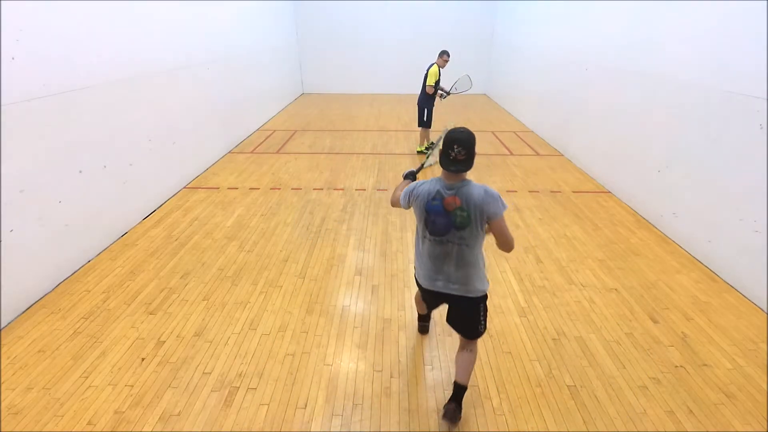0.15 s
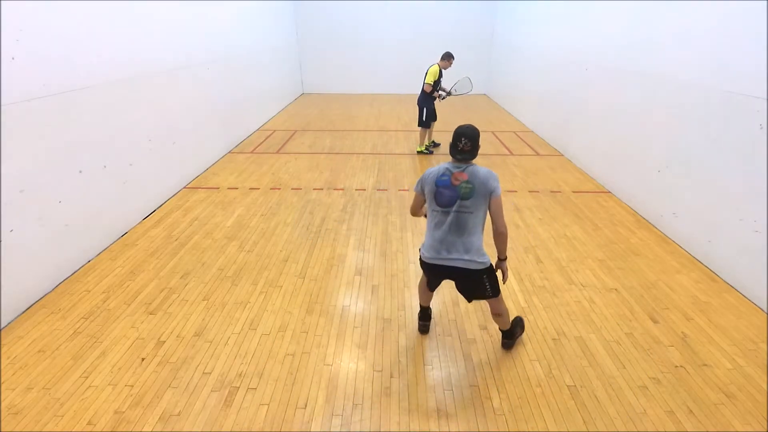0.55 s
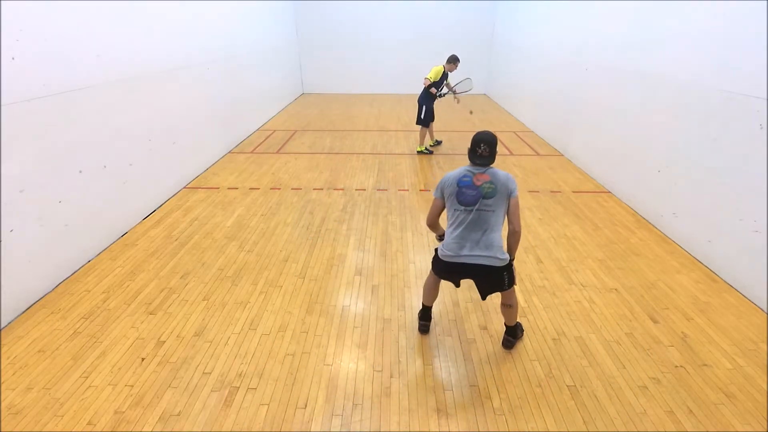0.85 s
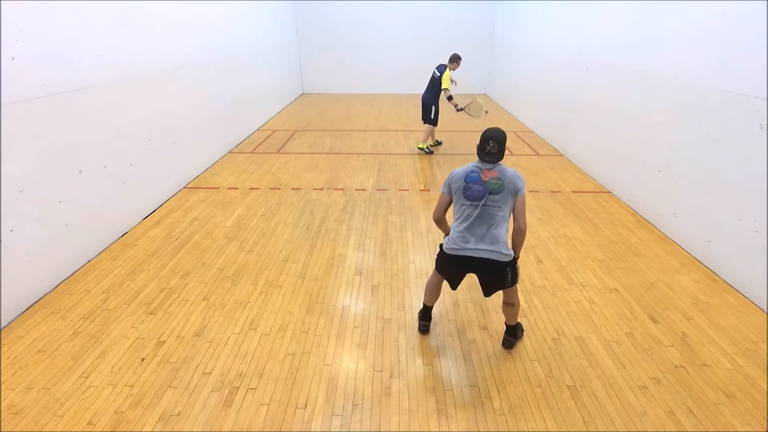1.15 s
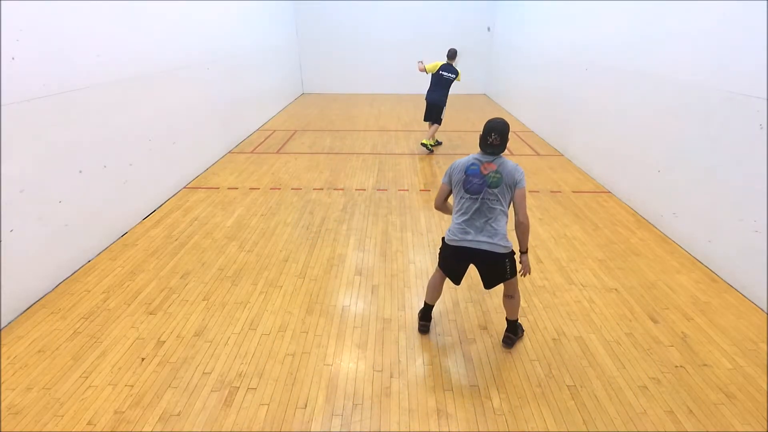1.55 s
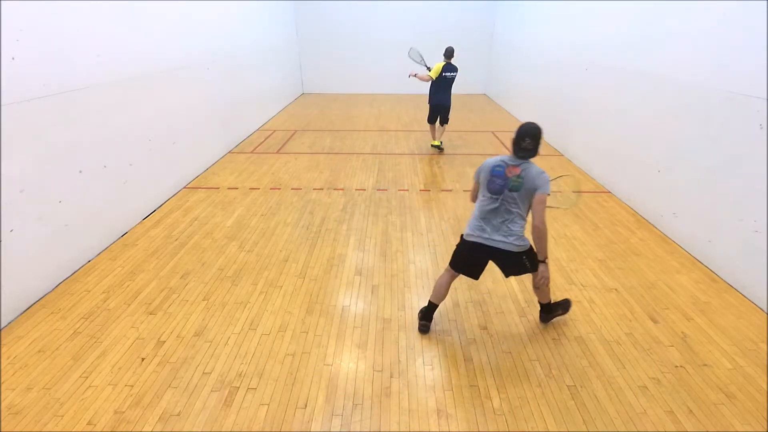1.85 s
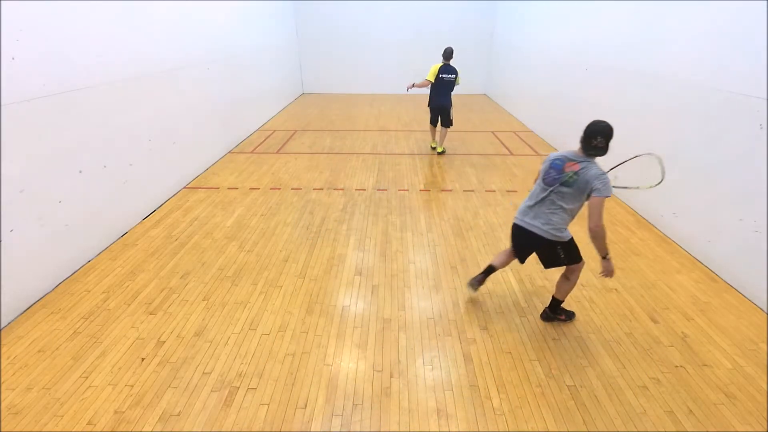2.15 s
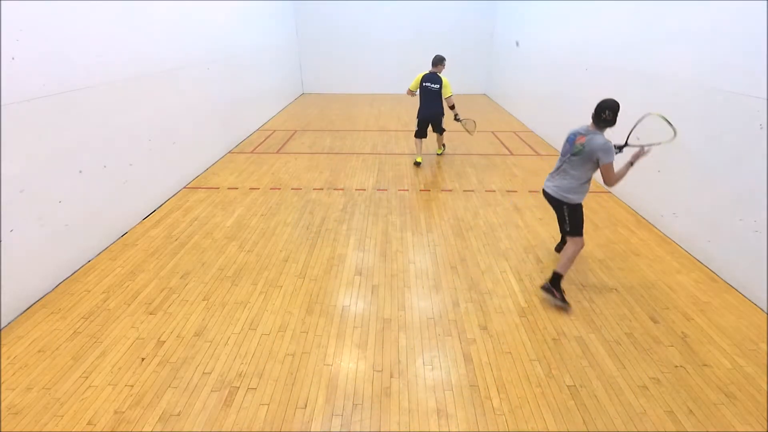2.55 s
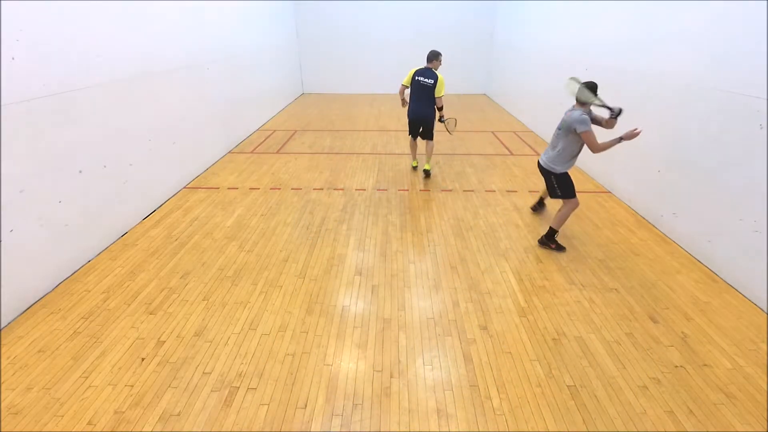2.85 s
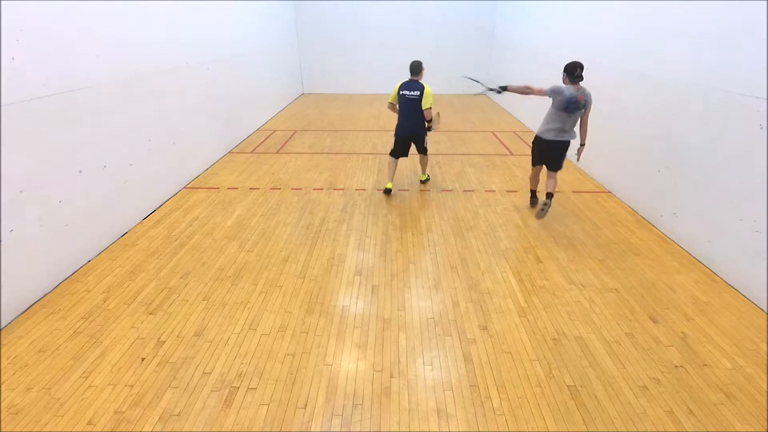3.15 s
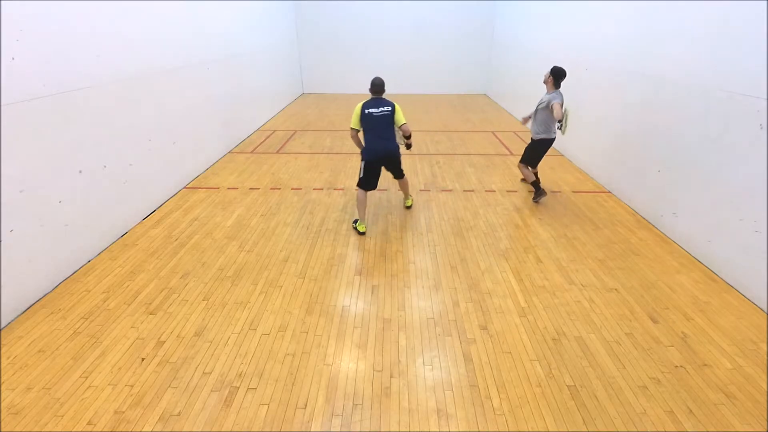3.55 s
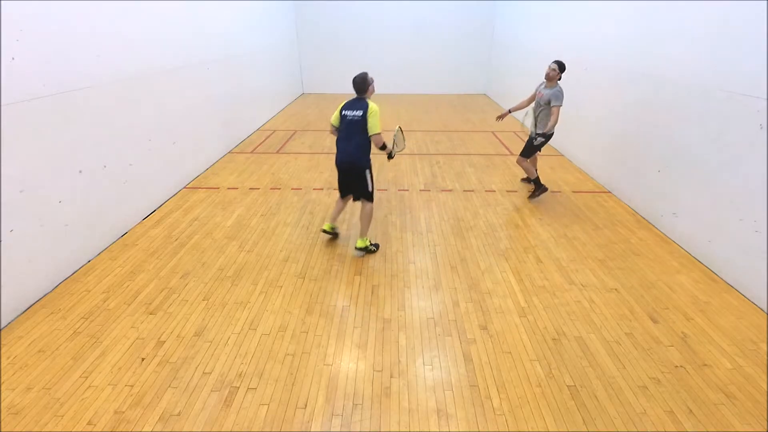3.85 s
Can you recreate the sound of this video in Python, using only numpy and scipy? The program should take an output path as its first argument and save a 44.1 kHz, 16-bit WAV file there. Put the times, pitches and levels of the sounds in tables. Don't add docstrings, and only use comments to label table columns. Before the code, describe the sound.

Hard racquetball blows boom and echo through a bare indoor court after a sharp shoe squeak

```python
import sys
import numpy as np
from scipy import signal
from scipy.fft import rfft, irfft
from scipy.io import wavfile
from scipy.ndimage import uniform_filter1d

SR = 44100
rng = np.random.default_rng(int(sys.argv[2]) if len(sys.argv) > 2 else 0)


def inscribe(sig):
    pcm = np.round(np.clip(np.atleast_2d(sig).T, -1, 1) * 32767)
    wavfile.write(sys.argv[1], SR, pcm.astype(np.int16))


def boost(x):
    u = np.asarray(x, float) / 20
    return 10 ** u


N = 176400

# (time [s], level [dB], contact brightness [Hz], boom [dB re
# blow], hollow ring [dB re blow])
BLOWS = [
    (-.3, -40.5, 1500, -9.5, -27),
    (.965, -50, 2500, -10.5, -22),
    (1.127, -38, 2500, -12.5, 2),
    (1.531, -46, 6000, -18, 6),
    (2.093, -29, 2500, -10.5, 11),
    (2.849, -53, 1500, 6, -8),
    (2.956, -33.5, 2500, -7, -38),
    (3.202, -8, 2000, -52, -1),
    (3.423, -5.5, 4000, -38, -4),
]


def set_rms(x, db):
    return x * boost(db) / np.sqrt(np.mean(x ** 2))


def along(table, hz, axis=1):
    table = np.array(table)
    return np.interp(np.log(hz + 1), np.log(table[:, 0]), table[:, axis])


def walk(rate_hz, size):
    k = max(int(SR / rate_hz), 1)
    noise = rng.standard_normal(size + 4 * k)
    smooth = uniform_filter1d(uniform_filter1d(noise, k), k)
    return smooth[2 * k:2 * k + size] * np.sqrt(1.5 * k)


def band_noise(low_hz, high_hz):
    band = signal.butter(2, [low_hz, high_hz], "band", fs=SR, output="sos")
    return signal.sosfilt(band, rng.standard_normal((2, N)))


def add(out, x, s):
    i = int(s * SR)
    x = x[:, max(-i, 0):N - i]
    out[:, max(i, 0):max(i, 0) + x.shape[1]] += x


def room_air():
    tilt_hz, level_db, swell_db = 1500, -37, 1
    pole = np.exp(-2 * np.pi * tilt_hz / SR)
    air = signal.lfilter([1], [1, -pole], rng.standard_normal((2, N)))
    return set_rms(air, level_db) * boost(swell_db * walk(4, size=N))


def floor_rumble():
    # (centre [Hz], width [Hz], level [dB])
    rumble = [(84, 22, -77.5), (158.5, 48, -73)]
    # (centre [Hz], width [Hz], level [dB])
    drones = [(151.8, 12, -72), (625, 42, -64)]
    # (time [s], swell over rumble [dB])
    steps = [
        (.35, 3.5),
        (.74, 0),
        (1.15, 13.5),
        (2.1, 22),
        (2.33, 22.5),
        (2.65, 16),
        (2.96, 26),
        (3.12, 15),
    ]
    rise_s, fall_s = 0.03, 0.12
    t = np.arange(N) / SR
    swell = 1
    for s, db in steps:
        late = np.maximum(t - s, 0)
        swell = swell + boost(db) * (1 - np.exp(-late / rise_s)) * np.exp(-late / fall_s)

    def hum(rows):
        return sum(set_rms(band_noise(f - w / 2, f + w / 2), db) for f, w, db in rows)

    return swell * hum(rumble) + hum(drones)


def blow(db, bright_hz, boom_db, ring_db):
    boom_hz, ring_hz, ring_t60_s = 185, 922.6, 0.035
    t = np.arange(2048) / SR

    def push(hz):
        return np.exp(-2 * np.pi * hz * t) * 2 * np.pi * hz / SR

    recoil = push(boom_hz / 2)
    contact = push(bright_hz) - recoil
    boom = boost(boom_db + 26) * (push(boom_hz) - recoil)
    ring = np.sin(2 * np.pi * ring_hz * t) * boost(-60 * t / ring_t60_s)
    ring = ring * 2 * np.log(1000) / ring_t60_s / SR
    return boost(db) * 100 * (contact + boom + boost(ring_db) * ring)


def court(first):
    # (frequency [Hz], t60 [s], build-up [s])
    decay = [(60, 0.3, 0.01), (201, 2.9, 0.02), (850, 2.08, 0.021), (2000, 3.06, 0.0045),
             (4000, 3.68, 0.0032), (7700, 1.57, 0.0034), (11100, 1.51, 0.002)]
    # (delay [s], level [dB], thinness [0-1])
    echoes = [(0, 5, 0.7), (.008, -14, 0.6), (.016, 2, .8), (0.028, -2, 0)]
    early_db, early_s, direct_s, hop = -9, 0.15, 0.001, 64
    hz = np.fft.rfftfreq(4 * hop, 1 / SR)[:, None]
    t = np.arange(N // hop + 4) * hop / SR
    rise = 1 - np.exp(-(t / along(decay, hz, axis=2)) ** 2)
    early = 1 + boost(early_db) * np.exp(-t / early_s)
    shape = rise * early * boost(-60 * t / along(decay, hz))
    chance = rng.standard_normal((2, 2) + shape.shape)
    spectrum = shape * (chance[0] + 1j * chance[1])
    tail = signal.istft(spectrum, nperseg=4 * hop, noverlap=3 * hop)[1][:, :N]
    tail = tail / np.sqrt(np.sum(tail ** 2) / 2 * 0.01)
    if first:
        for s, db, thin in echoes:
            burst = rng.standard_normal((2, 1024)) * np.exp(-np.arange(1024) / SR / direct_s)
            burst = signal.lfilter([1, -thin], [1], burst)
            add(tail, boost(db) * burst / np.sqrt(direct_s * SR / 2), s)
    return tail


def squeak(length_s, hz, db, over_db, scrape_db):
    wobble_share, chatter_db, upper_db = 0.017, 2.5, -17
    rise_s, fall_s, scrape_low_hz = 0.013, 0.003, 6000
    t = np.arange(int((length_s + 0.01) * SR)) / SR
    wobble = walk(150, size=len(t))
    pitch_hz = hz * (1 + wobble_share * (wobble - wobble.mean()))
    phase = 2 * np.pi * np.cumsum(pitch_hz) / SR
    overtones = np.sin(2 * phase) + boost(upper_db) * (np.sin(3 * phase) + np.sin(4 * phase))
    attack = np.clip(t / min(rise_s, length_s / 3), 0, 1)
    release = np.clip((length_s + fall_s - t) / fall_s, 0, 1)
    high = signal.butter(2, scrape_low_hz, "high", fs=SR, output="sos")
    scrape = boost(scrape_db) * signal.sosfilt(high, rng.standard_normal(len(t)))
    chatter = boost(chatter_db * walk(200, size=len(t)))
    tone = np.sin(phase) + boost(over_db) * overtones
    return boost(db + 15) * chatter * attack * release * (tone + scrape)


def wall_thud():
    centre_hz, t60_s, level_db = 65, 0.6, -38
    t = np.maximum(np.arange(N) / SR - BLOWS[-1][0], 0)
    shake = band_noise(centre_hz / 2, centre_hz * 1.45)
    return set_rms(shake, level_db) * (t > 0) * boost(-60 * t / t60_s)


def ringing(x, peaks, shell):
    # (centre [Hz], width [Hz])
    notches = [(1225, 38), (7650, 570), (9700, 110), (11800, 280), (12800, 120)]
    depth = 0.85
    hz = np.fft.rfftfreq(16384, 1 / SR)
    gain = boost(along(shell, hz))
    for f, w, db in peaks:
        gain = gain + boost(db) / (1 + (2 * (hz - f) / w) ** 2)
    for f, w in notches:
        gain = gain * (1 - depth / (1 + (2 * (hz - f) / w) ** 2))
    cepstrum = irfft(np.log(gain))
    cepstrum = np.concatenate([cepstrum[:1], 2 * cepstrum[1:8192], np.zeros(8192)])
    impulse = irfft(np.exp(rfft(cepstrum)))[:8192]
    return signal.fftconvolve(x, impulse)[:N]


def housing(sound):
    # (centre [Hz], width [Hz], level [dB])
    peaks_mid = [(161, 20, -36.5), (386, 130, -34.5), (623.5, 86, -23), (909.8, 95.4, -3.5),
                 (1069, 103, -15), (1429.6, 105, -14.5), (1621.5, 97, -16.5), (2403, 214, -16.5),
                 (3130, 640, -26.5), (3810, 240, -18), (5190, 280, -36), (6296, 170, -55.5)]
    peaks_side = [(885, 53, -23), (2100, 200, -27), (2500, 66, -46), (3740, 220, -18.5), (5060, 250, -24.5),
                  (6340, 400, -35.5), (8860, 300, -31.5)]
    # (frequency [Hz], level [dB])
    shell_mid = [(30, -89), (120, -39.5), (700, -26.5), (1220, -26.5), (2000, -28.5), (4500, -36.5),
                 (8000, -35), (15000, -43.5)]
    shell_side = [(30, -76), (300, -60.5), (1300, -29.5), (4300, -27), (7600, -35), (15000, -43.5)]
    lag = 0.29 * signal.hilbert(sound[0]).imag
    return ringing(sound[0], peaks_mid, shell_mid), ringing(sound[1] + lag, peaks_side, shell_side)


def scene():
    squeak_starts_s = [.548, .56, 2.946, 3.898]
    # (length [s], pitch [Hz], level [dB], overtones [dB re tone], scrape [dB re tone])
    squeaks = [
        (0.0058, 2439, -40.5, -20, 4),
        (0.0065, 3600, -40.5, -20, 11),
        (0.051, 3430, -4.5, -0.5, -3),
        (0.0064, 3200, -17.5, 10, 12.5),
    ]
    squeak_wet_db, squeak_side = -18, 0.5
    out = room_air()
    for s, *how in BLOWS:
        add(out, signal.fftconvolve(court(first=True), blow(*how)[None], axes=1), s)
    for s, how in zip(squeak_starts_s, squeaks):
        sound = squeak(*how) * np.array([[1], [squeak_side]])
        add(out, np.array([sound[0], signal.hilbert(sound[1]).imag]), s)
        add(out, boost(squeak_wet_db) * signal.fftconvolve(court(first=False), sound, axes=1), s)
    low = wall_thud() + floor_rumble()
    mid, side = housing(out)
    mid, side = mid + low[0], side + 0.2 * low[1]
    return np.array([mid + side, mid - side])


def low_pass(x):
    return signal.sosfilt(signal.butter(12, 16240, fs=SR, output="sos"), x)


def record(dry):
    hiss_db, hiss_side_db, hiss_low_hz = -57, 2.5, 278
    top_hz, clip = 15300, 0.995
    high = signal.butter(1, hiss_low_hz, "high", fs=SR, output="sos")
    hiss = set_rms(signal.sosfilt(high, rng.standard_normal((2, N))), hiss_db)
    hiss = hiss * np.array([[1], [boost(hiss_side_db)]])
    mix = dry + np.array([hiss[0] + hiss[1], hiss[0] - hiss[1]])
    mix = signal.sosfilt(signal.ellip(8, 0.2, 70, top_hz, fs=SR, output="sos"), mix)
    return low_pass(np.clip(mix, -clip, clip))


dry = scene()
out = record(dry)
inscribe(out)
```